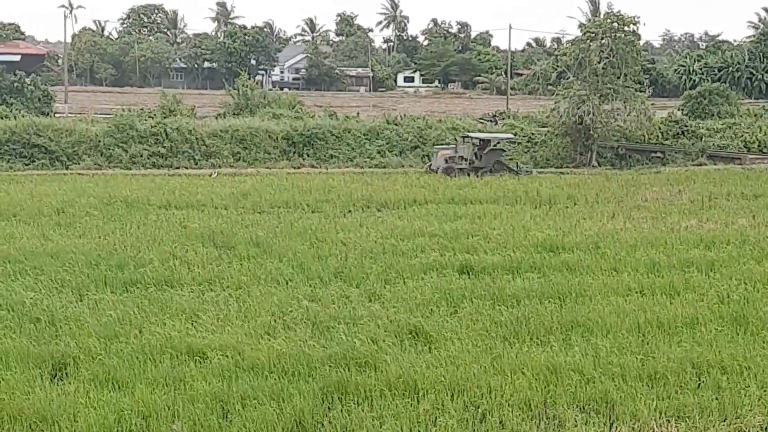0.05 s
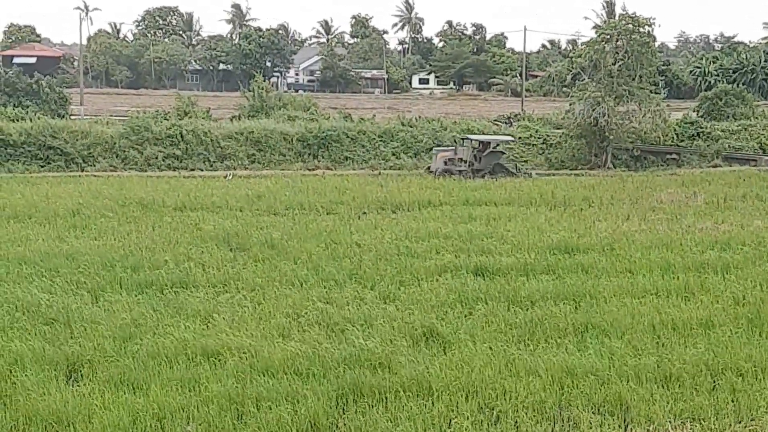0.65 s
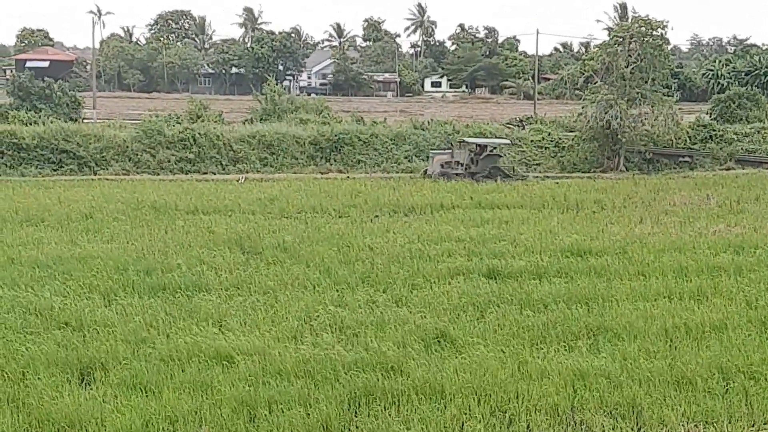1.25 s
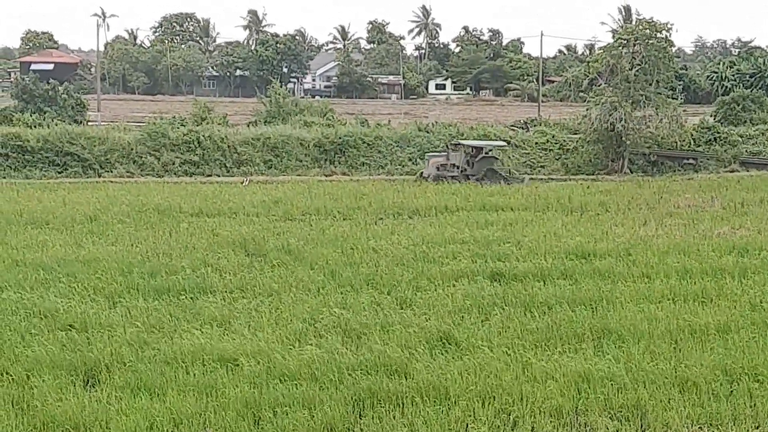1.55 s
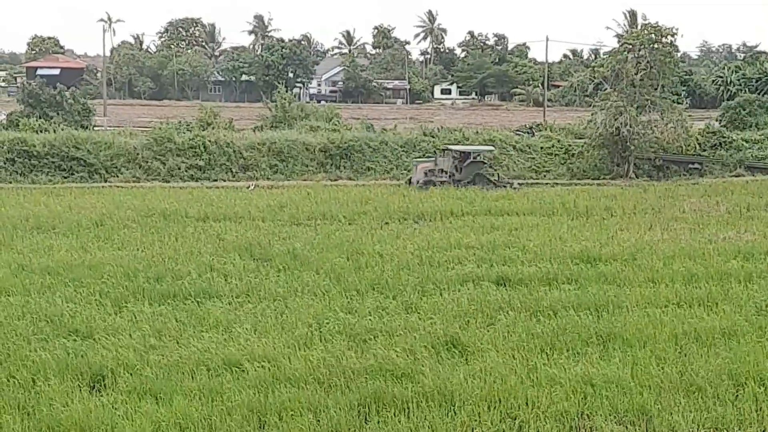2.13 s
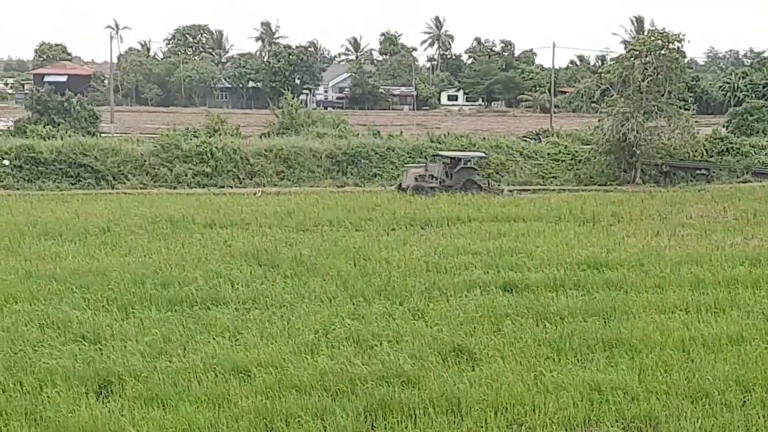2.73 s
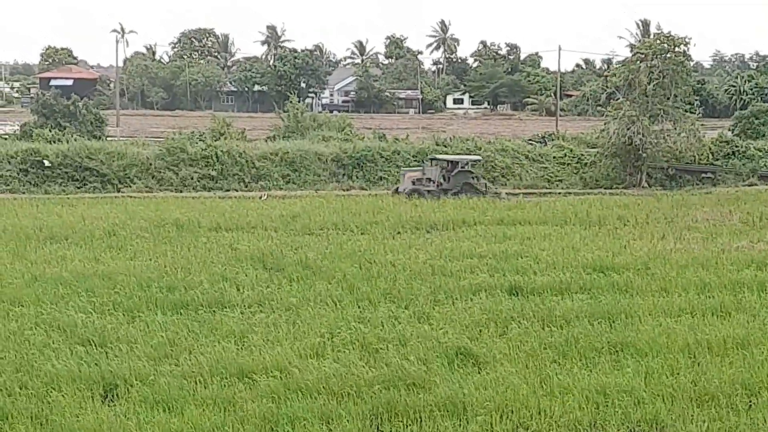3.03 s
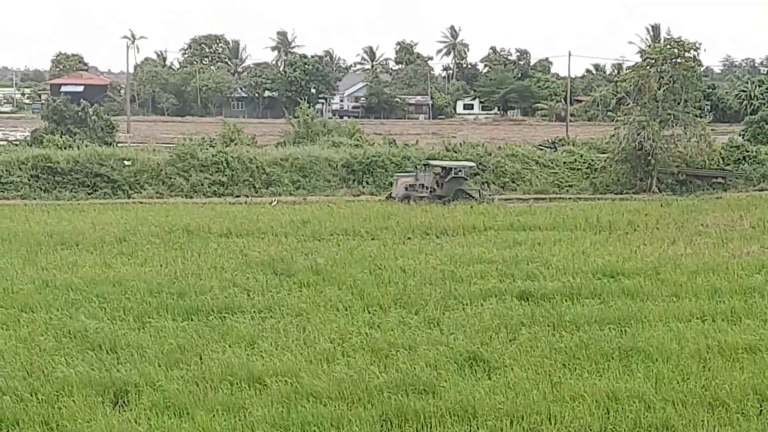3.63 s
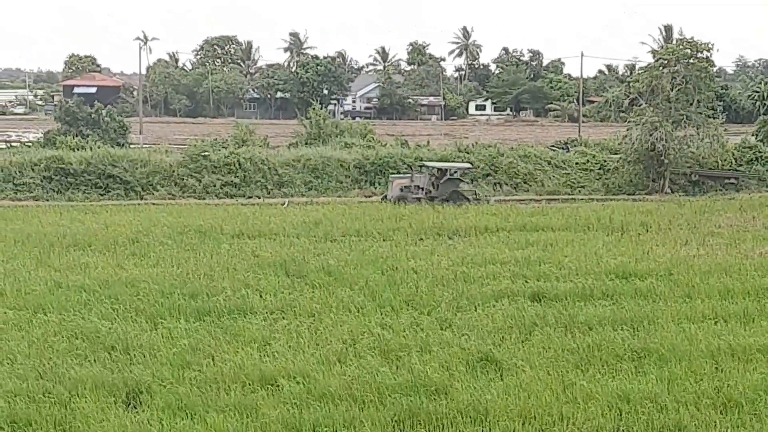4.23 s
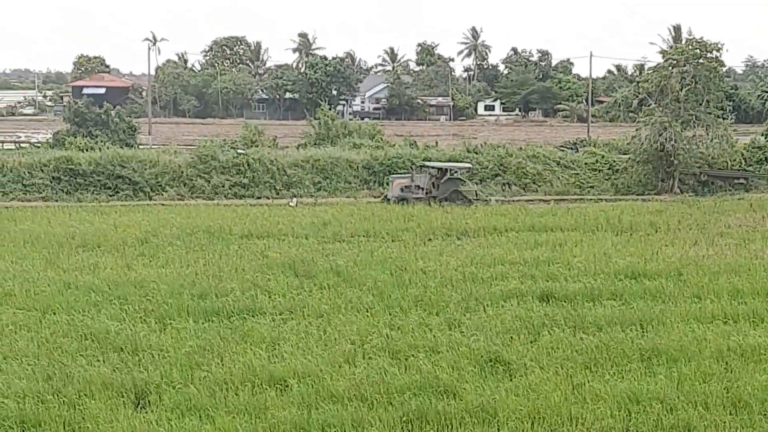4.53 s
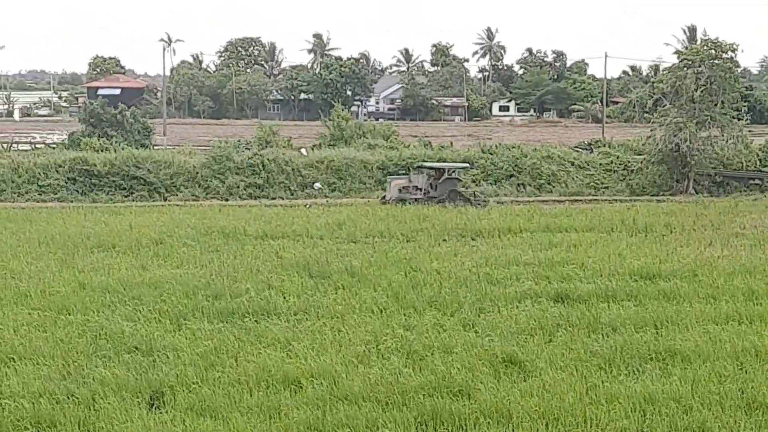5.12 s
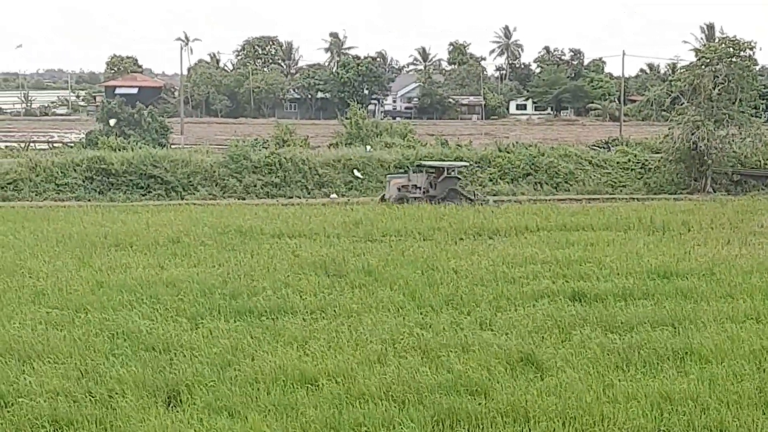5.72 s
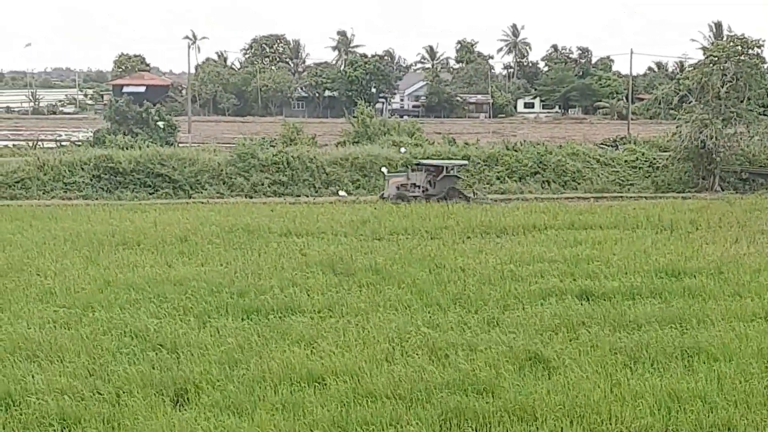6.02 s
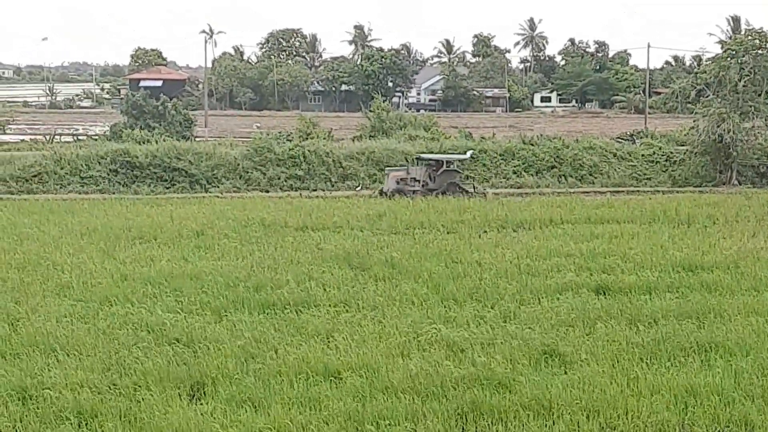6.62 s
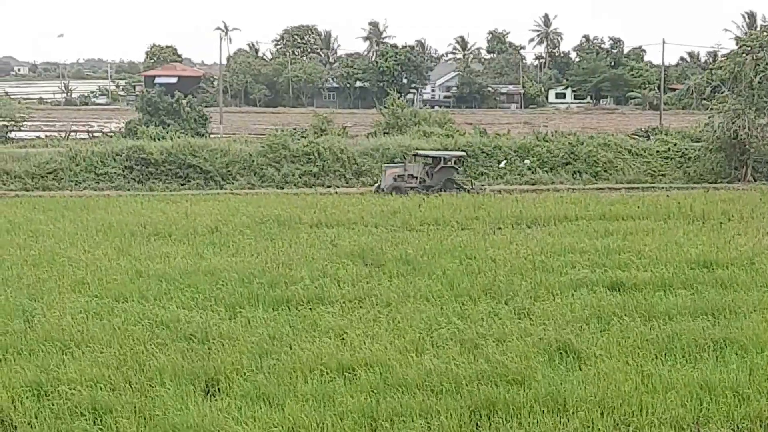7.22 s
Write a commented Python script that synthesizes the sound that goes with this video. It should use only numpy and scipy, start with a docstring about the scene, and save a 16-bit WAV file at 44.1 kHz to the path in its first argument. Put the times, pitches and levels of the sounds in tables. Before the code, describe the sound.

Across an open field, a distant tractor's diesel engine drones without a break, its panels and loose metal clattering. The engine slows a little as it labours near the start, picks up again, and eases slightly near the end, while the clatter drifts louder and softer. Low puffs of wind hit the microphone in the first couple of seconds and return lightly later, mostly on the left, above an even hush of open air.

```python
"""A distant tractor's diesel drones across a rice field, sagging a little as the load rises.
The exhaust hums at the firing rate. Each firing rattles the engine, its panels and loose metal;
moving air lets the clatter swell and fade. Fine ticking joins in while the engine labours hardest.
Over a dull open-air hush, a breeze buffets the microphone now and then, mostly on the left."""
import sys
import numpy as np
from scipy import signal
from scipy.fft import rfft, irfft
from scipy.io import wavfile
from scipy.ndimage import uniform_filter1d

SR = 44100
rng = np.random.default_rng(int(sys.argv[2]) if len(sys.argv) > 2 else 0)


def dump(signal):
    """Clip the signal to [-1, 1] and save it as 16-bit WAV at the path in sys.argv[1]."""
    limited = np.clip(np.atleast_2d(signal).T, -1, 1)
    pcm = np.round(limited * 32767).astype(np.int16)
    wavfile.write(sys.argv[1], SR, pcm)


N = 328986
TIME_S, BINS_HZ = np.arange(N) / SR, np.fft.rfftfreq(N, 1 / SR)

# engine speed, sagging under load: time_s, firing_hz
FIRING_RATE = [(0.0, 94.6), (0.3, 93.7), (0.9, 89.1), (1.5, 93.2), (2.35, 96.7), (3.05, 96.6), (3.6, 97.0),
               (4.26, 93.1), (4.96, 94.9), (5.31, 96.2), (5.81, 94.8), (5.96, 93.5), (6.31, 93.1),
               (6.76, 91.1), (7.46, 94.4)]
# exhaust fundamental: time_s, level_db
HUM_LEVEL = [(0.0, -23), (0.75, -22.0), (0.95, -24.5), (1.4, -21.2), (2.3, -24.5), (2.4, -23.0),
             (3.5, -21.5), (4.81, -23), (5.16, -21), (5.96, -22), (7.46, -21.5)]
# exhaust octave, stronger under load: firing_hz, level_db
HUM_OCTAVE = [(89, -28), (91.5, -29.5), (93, -32), (94.3, -36), (97, -41)]
# weak engine tones: firing_multiple, level_db
ENGINE_ORDERS = [(8 / 6, -51), (9 / 6, -50), (11 / 6, -48), (3.95, -55), (32 / 6, -55), (34 / 6, -52),
                 (38 / 6, -50), (40 / 6, -53), (50 / 6, -56), (54 / 6, -55), (56 / 6, -53), (68 / 6, -57)]
# phase lead of the left channel: freq_hz, lead_rad
LEFT_LEAD = [(20, 0), (94, .19), (600, .1), (860, -.4), (1380, 1.3), (1640, .4), (2240, 2.3), (3100, 4.8),
             (4130, 6.2), (5170, 9.2), (6500, 12.4), (15000, 12.6)]
# six firings of one cycle: force_db
CYLINDER_FORCE = [5, -5, 4, 4, 0.5, 2.5]
# clatter power carried by knocks: freq_hz, share
KNOCK_POWER = [(300, 0.07), (600, 0.27), (900, 0.43), (2000, 0.09), (4000, 0.72), (10000, .75)]
# rattling parts: centre_hz, repeating_share, decay_s, grit_db
RATTLE_PARTS = [(850, .3, .0033, .6), (2000, .2, .0035, 1.2), (4200, .05, .0038, 1.4), (7000, 0, .0038, 3),
                (11500, 0, .003, 3.6)]
# engine and panel resonances: centre_hz, width_hz, left_db, right_db
BODY_MODES = [(252, 230, -6.5, -7), (351, 142, 0, -8.5), (465, 70, 1, -3.5), (536, 72, -11, -3),
              (606, 46, -34, -1), (775, 168, 2, -40), (870.4, 66, -18, 5), (1005, 370, -5, -26),
              (1260, 194, -21, -3.5), (1563, 205, -3.5, -30), (1652, 107, -15.5, -3), (2085, 286, -10, -4),
              (2434, 224, -7.5, -9), (3102, 187, -13, -18.5), (3500, 380, -13.5, -37),
              (3787, 176, -18, -17.5), (4135, 296, -16.5, -17.5), (4530, 220, -14.5, -12),
              (4870, 470, -19.5, -15), (5290, 1180, -24.5, -20.5), (6610, 1300, -25, -27.5),
              (8220, 1650, -28, -31), (10850, 4000, -35.5, -36)]
# loose metal resonance: time_s, pitch_hz
RING_PITCH = [(0, 3900), (1, 4150), (1.9, 3860), (3.2, 4260), (5.2, 4010), (5.9, 3710), (6.7, 4100),
              (7.46, 4180)]
# its strength: time_s, swell_steps
RING_SWELL = [(0.0, -0.8), (1.1, 1.5), (2.15, -3.1), (2.75, 3), (4.56, 0), (4.66, -2), (5.01, 4),
              (5.61, -1.3), (6.01, 2.5), (7.46, -0.8)]
# clatter midrange: time_s, gain_db
MID_SWELL = [(0.0, -0.5), (1.35, 2), (1.75, -2.1), (2.9, -2), (4.26, 2.5), (5.31, 1), (5.46, 1.1),
             (7.16, 1), (7.46, -3.5)]
# clatter treble at 4 kHz: time_s, gain_db
TREBLE_SWELL = [(0.0, 1.5), (0.2, 0), (0.35, 2.5), (0.55, -1.9), (0.7, 2.5), (1.5, -0.3), (1.8, -2.5),
                (2.55, -2), (2.75, -1), (2.85, -5), (3.3, 2), (3.55, -3.5), (4.21, 5), (4.71, -1.4),
                (6.46, 0.5), (6.61, -6), (7.01, 3), (7.46, 1.5)]
# panel resonance near 2 kHz: time_s, gain_db
PANEL_SWELL = [(0.0, 2), (1.55, -2), (3.91, 4), (4.41, -3.8), (5.56, 7.5), (5.81, -0.6), (6.66, -2.6),
               (7.46, -0.5)]
# wind spectrum: freq_hz, density_db
RUMBLE_SPECTRUM = [(20, -14), (40, -1), (65, 9), (120, 9), (200, -5.5), (350, -6), (600, -25), (2000, -58)]
# one long gust, two short: start_s, end_s, relative_db
WIND_GUSTS = [(0.797, 2.267, -37.5), (2.75, 3.15, -41.5), (6.95, 7.2, -42.5)]
# eddies on the microphone: peak_s, relative_db, centre_hz, length_s
WIND_BUFFETS = [(.81, -26.5, 118, 0.085), (0.869, -31, 255, 0.027), (0.989, -25.5, 198, .04),
                (1.056, -25.5, 257, 0.027), (1.136, -24, 170, 0.026), (1.37, -29, 98, 0.08),
                (1.78, -32, 130, 0.067), (1.827, -28.5, 288, 0.053), (2.06, -35.5, 278, 0.077),
                (2.224, -29, 179, 0.06), (3.16, -32, 150, 0.095), (3.72, -38, 55, .09), (5.12, -40, 55, .1)]
# open-air background: freq_hz, density_db
AIR_SPECTRUM = [(20, -33), (45, -11), (70, -2), (130, 2), (220, -4), (500, -26.5), (1500, -18),
                (2800, -32.5), (8000, -41.5), (15000, -73)]


def exhaust(firings, firing_hz, waver_db=2, waver_hz=3.2, pan_db=1):
    """Near-sine hum at the firing rate, its octave, and faint tones locked to engine speed."""
    hum = amp(follow(HUM_LEVEL)) * np.cos(2 * np.pi * firings)
    hum += amp(at_hz(HUM_OCTAVE, firing_hz)) * np.cos(4 * np.pi * firings - np.pi / 4)
    for order, level_db in ENGINE_ORDERS:
        gain = amp(level_db + waver_db * wander(waver_hz))
        hum += gain * np.cos(2 * np.pi * (order * firings + rng.random()))
    stereo = np.sqrt(2) * amp([[pan_db], [-pan_db]]) * rfft(hum)
    stereo[1] *= np.exp(-1j * at_hz(LEFT_LEAD))
    return irfft(stereo, N)


def clatter(firings, level_db=-36, spread=0.34, spread_hz=6500, unsteady_db=1):
    """Knocks and steady churning ring the engine's resonances; the treble spreads widest in stereo."""
    onsets = firing_samples(firings)
    count = len(onsets)
    force_db = np.resize(CYLINDER_FORCE, count) + unsteady_db * rng.standard_normal(N)[:count]
    share = at_hz(KNOCK_POWER)
    drive = np.sqrt(1 - share) * rfft(rng.standard_normal((3, N)))  # rows: common, left, right
    centres_hz = [part[0] for part in RATTLE_PARTS]
    for (_, repeat, decay_s, grit_db), selector in zip(RATTLE_PARTS, np.eye(len(RATTLE_PARTS))):
        band = np.interp(BINS_HZ, centres_hz, selector)
        shake = rng.standard_normal((3, N))
        shake[0] = np.sqrt(1 - repeat) * shake[0] + np.sqrt(repeat) * crank_noise(firings)
        drive += np.sqrt(share * band) * rfft(knocks(onsets, force_db, decay_s, grit_db) * shake)
    stereo = (drive[0] + spread * np.hypot(1, BINS_HZ / spread_hz) * drive[1:]) * engine_body()
    stereo[1] *= np.exp(-1j * at_hz(LEFT_LEAD))
    return amp(level_db) * unit_rms(irfft(stereo * reflections(), N))


def knocks(onsets, force_db, decay_s, grit_db, rise_s=0.001, scatter_s=0.00082):
    """Envelope of a rattling part: one burst per firing; more grit, less alike."""
    size, lag = rng.uniform(-1.6, 1, (len(onsets), 2)).T
    struck = np.clip(onsets + (lag * scatter_s * SR).astype(int), 0, N - 1)
    blows = np.zeros(N)
    blows[struck] = amp(force_db + grit_db * size)
    t = TIME_S[:SR // 20]
    burst = np.exp(-t / decay_s) * (1 - np.exp(-t / rise_s))
    return unit_rms(signal.oaconvolve(blows, burst)[:N] * roughness(grit_db, rate_hz=810))


def crank_noise(firings, points=2800):
    """Noise tied to crank angle, alike in every engine cycle."""
    cycle = firings / len(CYLINDER_FORCE) % 1
    return unit_rms(np.interp(cycle * points, np.arange(points), rng.standard_normal(points)))


def engine_body():
    """Stereo response of engine and panels; minimum phase, so they ring only once struck."""
    power = sum(amp([[left_db], [right_db]]) ** 2 / (1 + (2 * (BINS_HZ - hz) / width_hz) ** 2) ** 2
                for hz, width_hz, left_db, right_db in BODY_MODES)
    cepstrum = irfft(np.log(np.maximum(np.sqrt(power.mean(0)), 1e-5)), N)
    cepstrum[1:N // 2] *= 2
    cepstrum[N // 2 + 1:] = 0
    return np.sqrt(power) * np.exp(1j * rfft(cepstrum).imag)


def reflections(latest_s=0.014, above_hz=2500, count=6, gain=0.09):
    """Response of direct sound plus close echoes; small surfaces return only treble."""
    delays = (SR * latest_s * rng.uniform(0.2009, 1, (2, count))).astype(int)
    taps = np.zeros((2, N))
    np.put_along_axis(taps, delays, gain * rng.choice([-1, 1], delays.shape), 1)
    return 1 + rfft(taps) * BINS_HZ / np.hypot(BINS_HZ, above_hz)


def loose_metal(x, width_hz=330, gain=1.45, drift=0.017, step_db=2.3):
    """Adds metal ringing on after each knock, at a shifting pitch."""
    pitch_hz = follow(RING_PITCH) * (1 + drift * wander(rate_hz=6))
    carrier = np.exp(2j * np.pi * np.cumsum(pitch_hz) / SR)
    pole = np.exp(-np.pi * width_hz / SR)
    ringing = 2 * (carrier * signal.lfilter([1 - pole], [1, -pole], x / carrier)).real
    return x + gain * amp(step_db * follow(RING_SWELL)) * ringing


def load_and_air(x, usual_hz=94.4, knock_db_per_hz=0.56, patch_db=1.57, flutter_db=2.18):
    """Load and moving air swell and fade the clatter, treble most, with slow patches and flutter."""
    hz, t, spectrum = signal.stft(x, SR, nperseg=512)
    treble = np.interp(hz, [1700, 4000], [0, 1])
    mids = (1 - treble) * hz ** 4 / (hz ** 4 + 370 ** 4)
    depth = 1 + 0.46 * np.log2(np.maximum(hz / 4000, 1))
    # as the panel swells, the resonance below gives way
    seesaw = bump(hz, centre_hz=2170, width_hz=220) - 0.3 * bump(hz, centre_hz=1640, width_hz=130)
    gain_db = np.outer(mids, follow(MID_SWELL, t))
    gain_db += np.outer(treble * depth, follow(TREBLE_SWELL, t))
    gain_db += np.outer(seesaw, follow(PANEL_SWELL, t))
    # diesel knock hardens as speed sags
    sag_hz = usual_hz - follow(FIRING_RATE, t)
    gain_db += knock_db_per_hz * np.outer(bump(hz, centre_hz=880, width_hz=190), sag_hz)
    flutter_band = (hz / np.hypot(hz, 3000))[:, None]
    gain_db += flutter_db * flutter_band * patches(gain_db.shape, bins=12, frames=9)
    stereo_db = gain_db + patch_db * patches(spectrum.shape, bins=3, frames=70)
    return signal.istft(spectrum * amp(stereo_db), SR, nperseg=512)[1][:, :N]


def ticking(firings, level_db=-63, pitch_hz=12100, width_hz=1100, uneven_db=4):
    """A small metal part ticks once per firing during the deepest sag."""
    onsets = firing_samples(firings)
    force_db = uneven_db * wander(rate_hz=7)[onsets]
    bursts = knocks(onsets, force_db, decay_s=0.0016, grit_db=3) * rng.standard_normal(N)
    ticks = unit_rms(irfft(rfft(bursts) / (1 + 2j * (BINS_HZ - pitch_hz) / width_hz) ** 2, N))
    return amp(level_db) * ticks * spell(start_s=0.33, end_s=1.46, rise_s=0.1, fall_s=0.2)


def wind(rumble_gain_db=5, buffet_gain_db=2, right_db=-8, flicker_db=0.5):
    """Rumble and eddies on the microphone, unrelated left and right."""
    noise = rfft(rng.standard_normal((2, N)))
    rumble = unit_rms(irfft(noise * amp(at_hz(RUMBLE_SPECTRUM)), N))
    out = rumble * breeze() * amp(rumble_gain_db + flicker_db * wander(rate_hz=42))
    for peak_s, relative_db, centre_hz, length_s in WIND_BUFFETS:
        buffet = eddy(centre_hz, length_s)
        n = buffet.shape[1]
        start = round(peak_s * SR) - n // 2
        out[:, start:start + n] += amp(relative_db + buffet_gain_db) * buffet
    return out * amp([[0], [right_db]])


def breeze(draught_db=-50.5):
    """Wind strength: gusts over a light draught, both lumpy."""
    gusts = sum(amp(db) * spell(start_s, end_s, rise_s=0.08, fall_s=0.16)
                for start_s, end_s, db in WIND_GUSTS)
    return (amp(draught_db) + gusts) * roughness(depth_db=3, rate_hz=9.2)


def eddy(centre_hz, length_s, log_width=0.23):
    """One eddy strikes: a short swell of low, narrow-band noise."""
    t = TIME_S[:SR // 4]
    hz = np.fft.rfftfreq(len(t), 1 / SR)
    band = np.exp(-0.5 * (np.log((hz + 1) / centre_hz) / log_width) ** 2)
    envelope = np.exp(-(2 * (t - t.mean()) / length_s) ** 2)
    puff = irfft(rfft(rng.standard_normal((2, len(t)))) * band, len(t)) * envelope
    return puff * np.linalg.norm(envelope) / np.linalg.norm(puff, axis=1, keepdims=True)


def open_air(level_db=-39, spread=0.75):
    """Dull, even hush, mostly common to both channels."""
    noise = rfft(rng.standard_normal((3, N)))
    stereo = (noise[0] + spread * noise[1:]) * amp(at_hz(AIR_SPECTRUM))
    return amp(level_db) * unit_rms(irfft(stereo, N))


def amp(db):
    return 10 ** (np.asarray(db) / 20)


def unit_rms(x):
    return x / np.sqrt(np.mean(x ** 2) + 1e-20)


def at_hz(table, hz=BINS_HZ):
    freq_hz, values = np.transpose(table)
    return np.interp(np.log(hz + 1), np.log(freq_hz + 1), values)


def follow(table, time_s=TIME_S):
    return np.interp(time_s, *np.transpose(table))


def firing_samples(firings):
    return np.flatnonzero(np.diff(np.floor(firings + 0.5)))


def wander(rate_hz):
    """Unit-RMS random drift below rate_hz."""
    return unit_rms(irfft(rfft(rng.standard_normal(N)) / (1 + (BINS_HZ / rate_hz) ** 4), N))


def roughness(depth_db, rate_hz):
    """Random gain, soft-limited to twice depth_db."""
    return amp(depth_db * 2 * np.tanh(wander(rate_hz) / 2))


def patches(shape, bins, frames):
    """Unit-RMS random blotches in frequency and time."""
    smeared = uniform_filter1d(rng.standard_normal(shape), bins, axis=0)
    return unit_rms(uniform_filter1d(smeared, frames, axis=1))


def spell(start_s, end_s, rise_s, fall_s):
    """Envelope: full from start_s to end_s, exponential either side."""
    return np.exp(-np.maximum(start_s - TIME_S, 0) / rise_s - np.maximum(TIME_S - end_s, 0) / fall_s)


def bump(hz, centre_hz, width_hz):
    return np.exp(-((hz - centre_hz) / width_hz) ** 2)


def scene():
    """One crankshaft drives hum, clatter and ticking; air and wind surround them."""
    firing_hz = follow(FIRING_RATE)
    firings = np.cumsum(firing_hz) / SR  # running count
    hum = exhaust(firings, firing_hz)
    rattle = load_and_air(loose_metal(clatter(firings)))
    return hum + rattle + ticking(firings) + open_air() + wind()


def record(dry):
    """Low-pass at 15.75 kHz."""
    lowpass = signal.firwin(511, 15750, window=("kaiser", 9), fs=SR)
    return signal.oaconvolve(dry, lowpass[None], "same")


dry = scene()
out = record(dry)
dump(out)
```